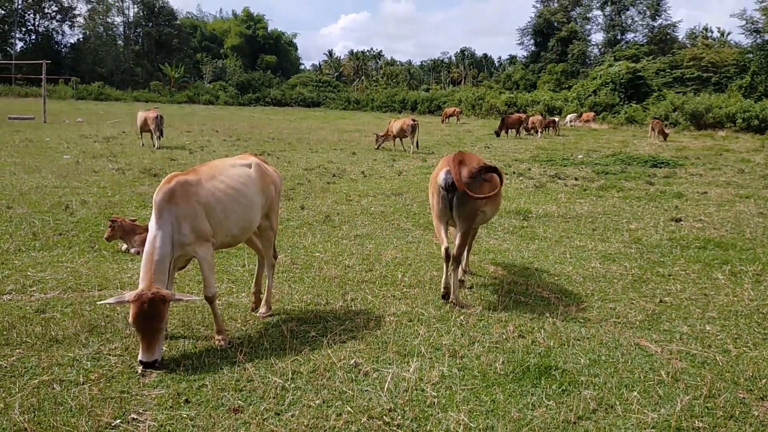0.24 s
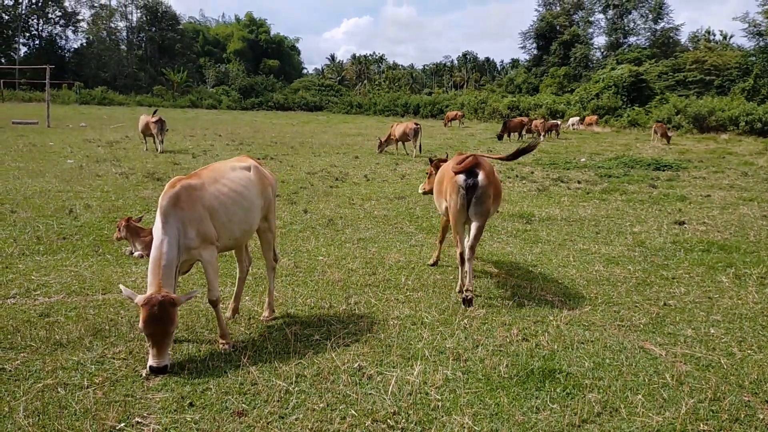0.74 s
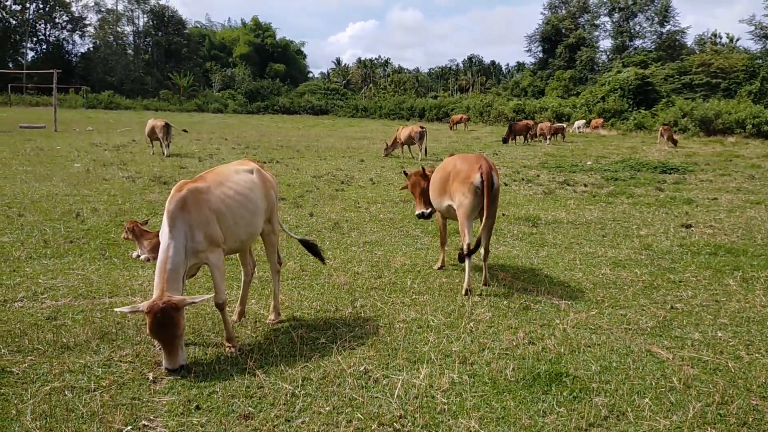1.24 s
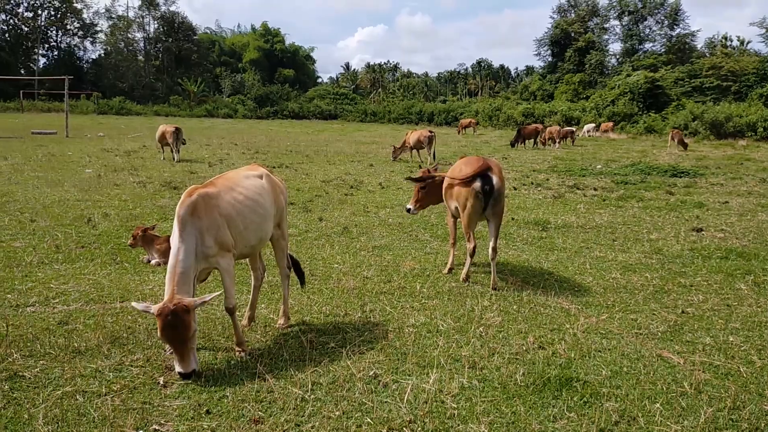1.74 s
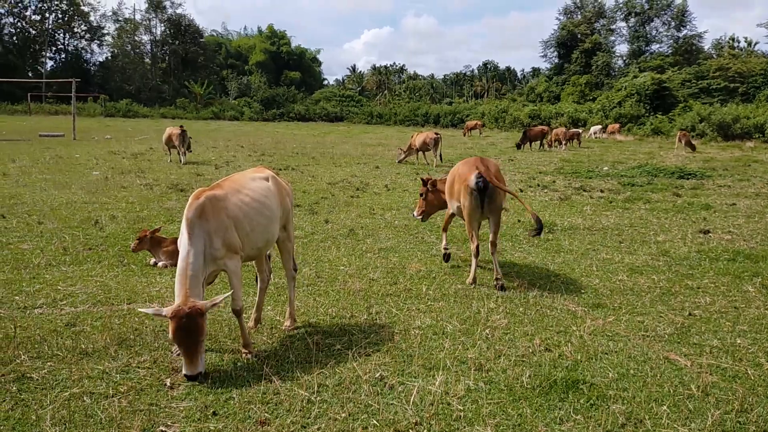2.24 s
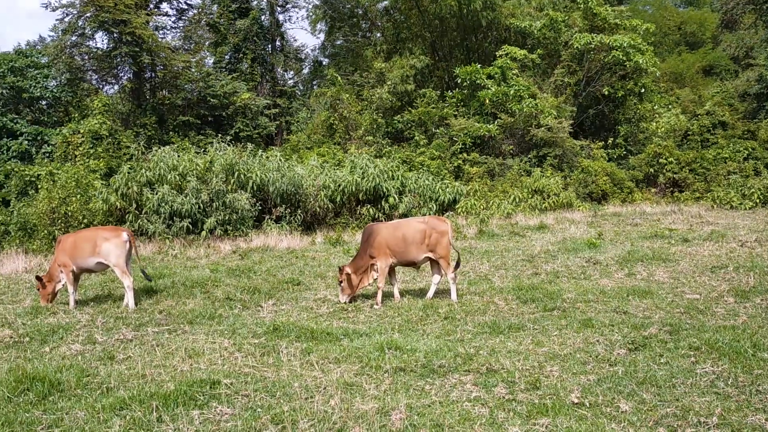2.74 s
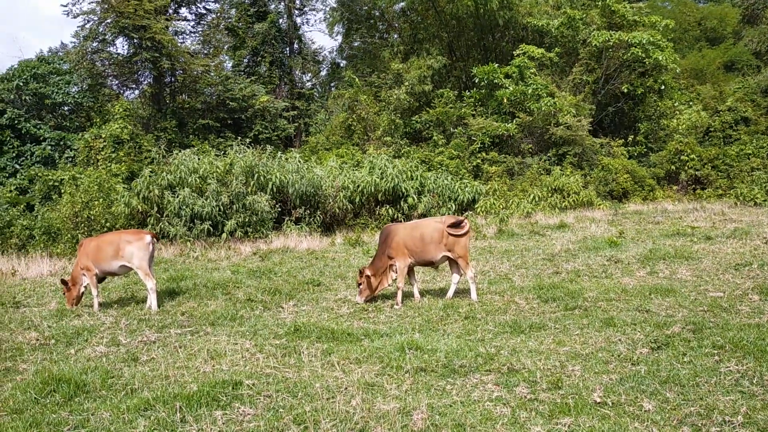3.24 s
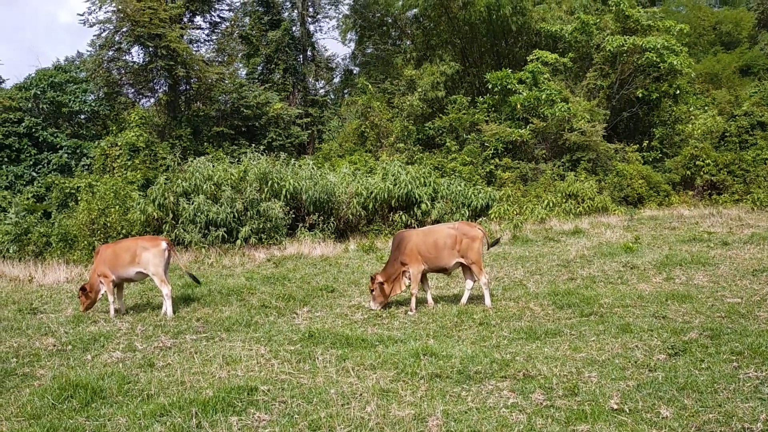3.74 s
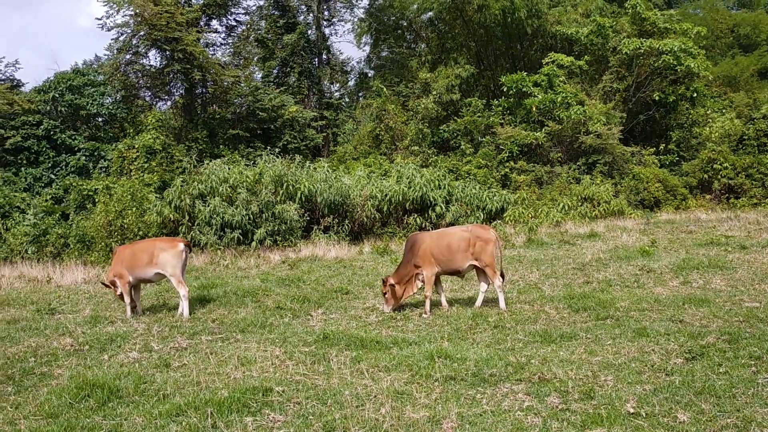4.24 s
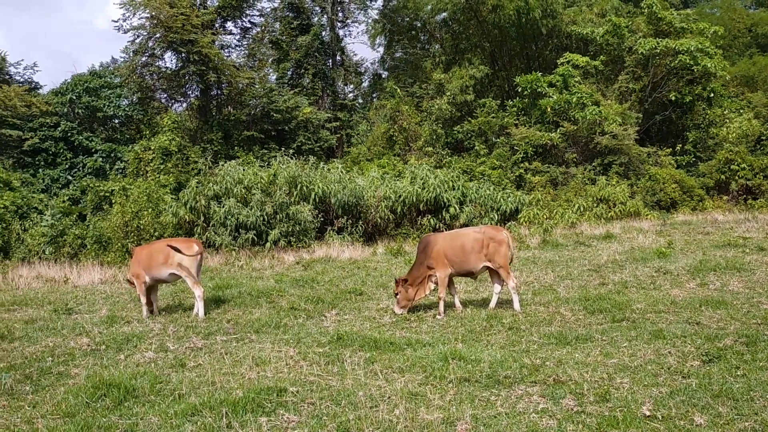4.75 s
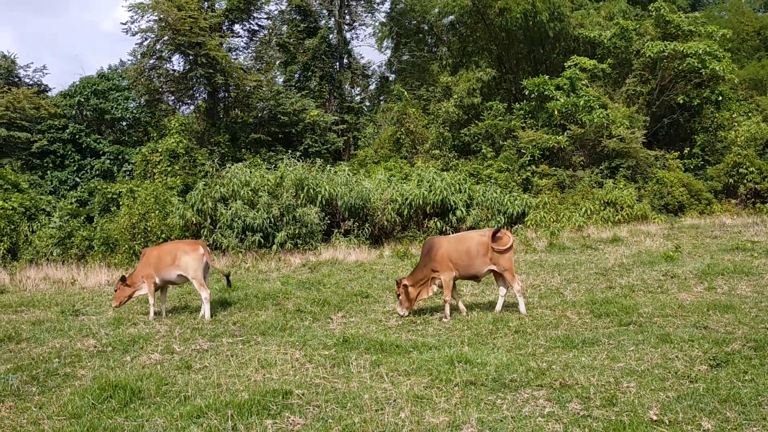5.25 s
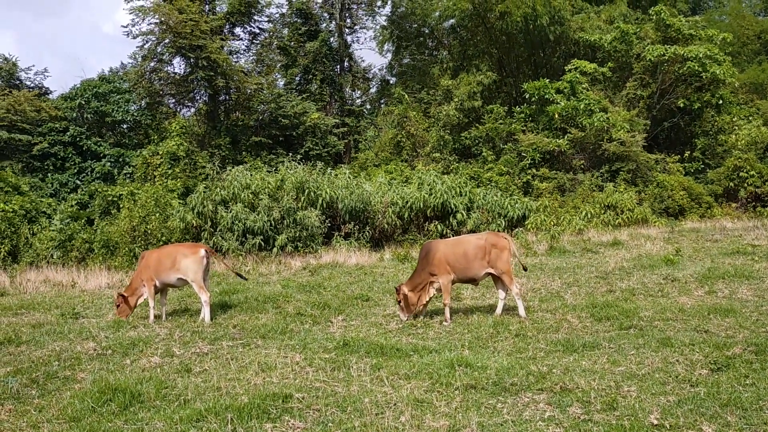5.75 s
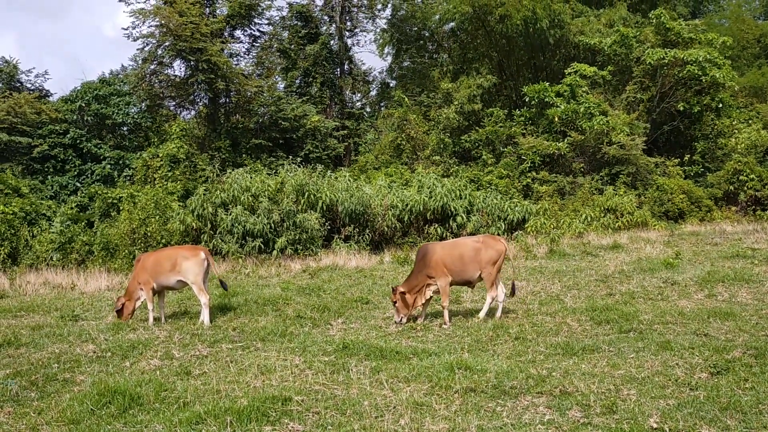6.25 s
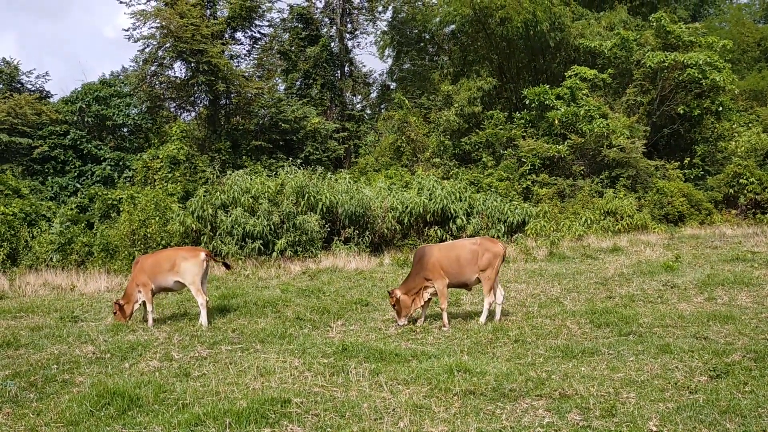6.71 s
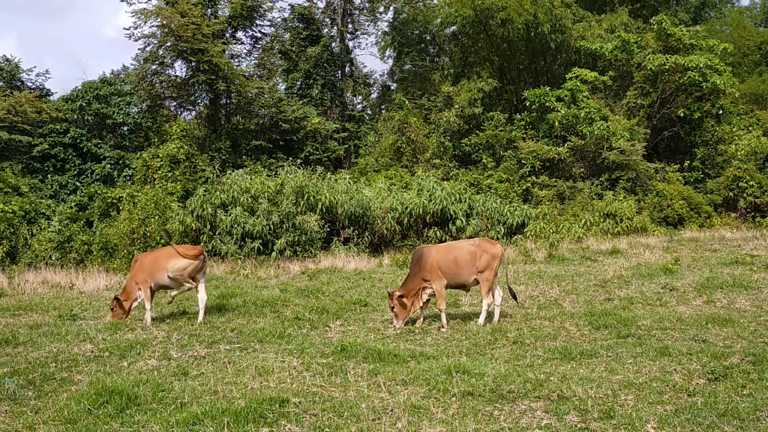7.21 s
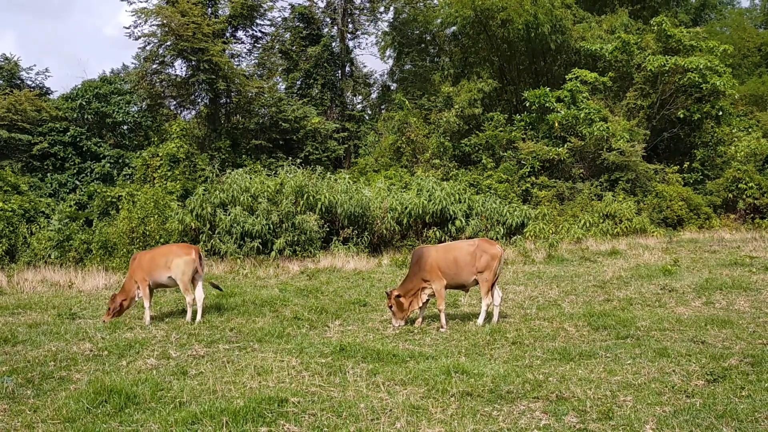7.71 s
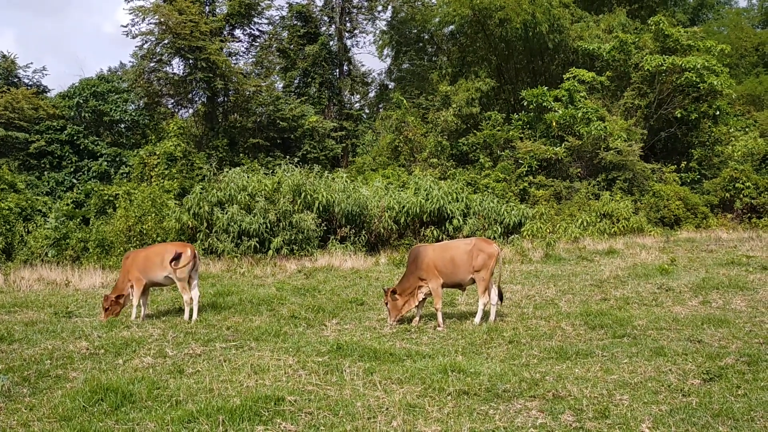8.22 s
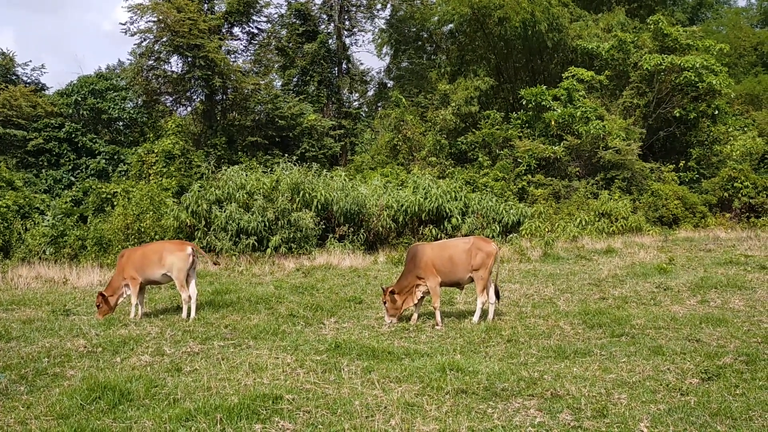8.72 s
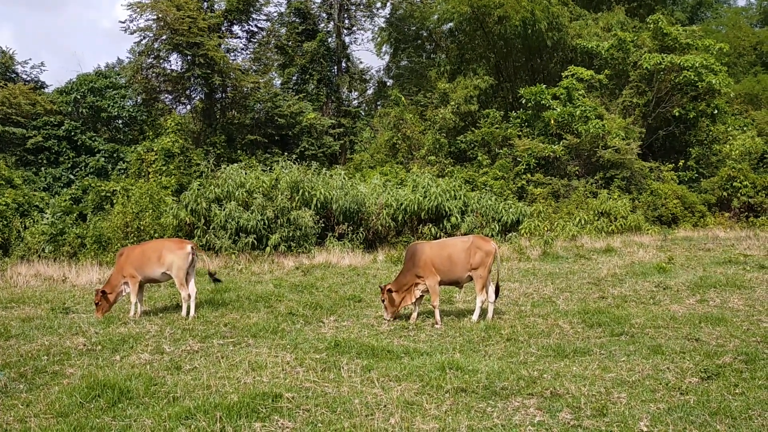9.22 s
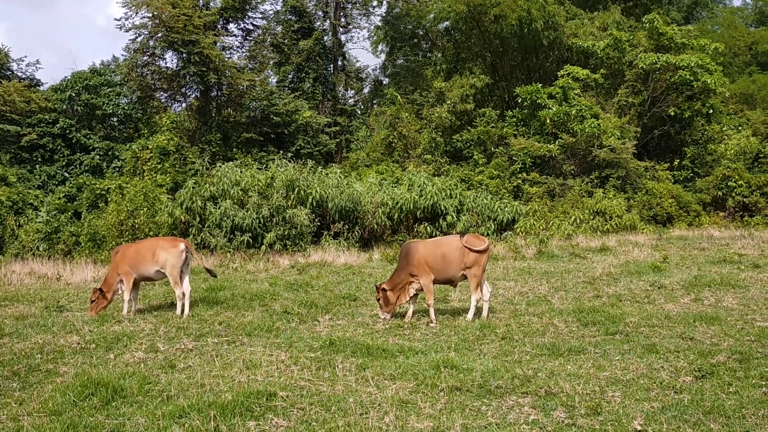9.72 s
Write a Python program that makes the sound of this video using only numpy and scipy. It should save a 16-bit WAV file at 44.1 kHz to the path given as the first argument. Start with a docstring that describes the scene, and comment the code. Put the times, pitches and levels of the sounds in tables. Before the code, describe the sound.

A cow's moo breaks into a rough bellow, then a long two-part moo follows, with light wind and thin bird whistles in a pasture.

```python
"""Cattle in an open pasture. Light wind rumbles on the microphone over a faint hiss, and grass ticks.
A cow moos, then breaks upward into a rough bellow: her vocal folds pulse, her throat rings and
her mouth opens. Small knocks follow, and thin bird whistles begin to pass now and then.
From about six seconds comes a long call in two parts, the first brassy and clear, the second duller.
Every call echoes off the tree line, and the low rumble rises under it."""
import sys
import numpy as np
from scipy import signal
from scipy.fft import rfft, irfft
from scipy.io import wavfile
from scipy.ndimage import uniform_filter1d, map_coordinates

SR = 44100
rng = np.random.default_rng(int(sys.argv[2]) if len(sys.argv) > 2 else 0)


def digitize_waveform(pressure):
    """Quantize a signal to 16-bit integers and store it at the path in sys.argv[1].

    Rows of a 2-D input are taken as channels; values are limited to [-1, 1].
    """
    field = np.atleast_2d(pressure).T
    bounded = np.clip(field, -1, 1)
    quanta = np.round(bounded * 32767).astype(np.int16)
    wavfile.write(sys.argv[1], SR, quanta)


N = 439677
TIME = np.arange(N) / SR
BREEZE_DB = 7 * np.exp(-TIME / 5.3)   # extra stir at the start, dying down


def from_db(db):
    """Turn decibels into a gain."""
    return 10 ** (np.asarray(db) / 20)


def rms_one(x):
    """Scale a sound to an average power of 1."""
    return x / np.sqrt(np.mean(x ** 2) + 1e-20)


def in_time(rows, t):
    """Join a table's rows with straight lines and read each column at the times t."""
    times, *columns = np.transpose(rows)
    return [np.interp(t, times, column) for column in columns]


def butter(x, hz, kind, order=2):
    """Keep the lows, the highs or one band of a sound."""
    return signal.sosfilt(signal.butter(order, hz, kind, fs=SR, output="sos"), x)


def drift(rate_hz, size):
    """A smooth random wobble, about 1 in size, that changes about rate_hz times a second."""
    slow = butter(rng.standard_normal(size + SR), rate_hz, "low")
    return rms_one(slow)[SR:]


def coloured(spectrum, alike):
    """Stereo noise of power 1, shaped by a spectrum; alike=1 makes left and right the same."""
    hz, db = np.transpose(spectrum)
    bins_hz = np.arange(N // 2 + 1) * SR / N
    gain = from_db(np.interp(np.log(bins_hz + 1), np.log(hz), db))
    mid, side = irfft(rfft(rng.standard_normal((2, N))) * gain, N)
    return rms_one(mid + np.sqrt((1 - alike) / (1 + alike)) * side * [[1], [-1]])


# Tone of the rumble: frequency_hz, relative_db
RUMBLE_SPECTRUM = [(22, -29.5), (46, -7), (80, -10), (150, -30.5), (1000, -62.5)]
# Rises of the rumble, three under the calls and two short thumps: start_s, end_s, level_db
RUMBLE_RISES = [(.62, 2.347, -45), (1.78, 1.876, -21), (2.998, 3.29, -47), (6.07, 7.548, -39.5),
                (7.3, 9.6, -42)]


def rumble(calm_db=-62, rise_s=0.15, lumps_db=5):
    """A low, lumpy rumble that rises under each call, with two short thumps."""
    strength = from_db(calm_db + .5 * BREEZE_DB)
    for start, end, db in RUMBLE_RISES:
        ramp = np.minimum(TIME - start, end - TIME) / min(rise_s, (end - start) / 2)
        strength += from_db(db) * np.clip(ramp, 0, 1) ** 2
    return strength * from_db(lumps_db * drift(5.5, N)) * coloured(RUMBLE_SPECTRUM, alike=.5)


# Tone of the open air: frequency_hz, relative_db
AIR_SPECTRUM = [(40, -28), (100, -6.5), (330, -27), (700, -26.5), (2100, -33), (6500, -48)]


def open_air(calm_db=-62.5):
    """A soft wash that sinks as the breeze in the leaves dies down."""
    return from_db(calm_db + BREEZE_DB) * coloured(AIR_SPECTRUM, alike=1)


# Tone of the hiss: frequency_hz, relative_db
HISS_SPECTRUM = [(3000, -36.5), (7000, -10), (8100, 4), (9100, -22.5), (12500, -11), (14800, 1.5)]
# Brief flickers of the top treble: time_s, level_db
TREBLE_FLICKERS = [(3.492, -50.5), (4.88, -47.5), (5.77, -45.5), (6.32, -49), (7.35, -50), (7.858, -44.5)]


def faint_hiss(level_db=-61, flicker_s=0.0053):
    """A faint hiss, with brief flickers in the highest treble."""
    hiss = from_db(level_db + drift(12, N)) * coloured(HISS_SPECTRUM, alike=1)
    swell = from_db(-64 - BREEZE_DB + 5.5 * drift(2.2, N))
    flickers = sum(from_db(db) / (1 + ((TIME - s) / flicker_s) ** 2) for s, db in TREBLE_FLICKERS)
    flutter = from_db(2.2 * drift(80, N))
    treble = butter(rng.standard_normal(N), 12500, "high")
    return hiss + (swell + flickers) * flutter * treble


# Rustling tufts: start_s, length_s, level_db
GRASS_TUFTS = [(0.047, 0.72, -61.5), (2.67, 0.43, -63), (4.11, 0.38, -65)]


def grass(ticks_per_s=11, settle_s=3.7, grains_per_s=500, band_hz=(450, 1700)):
    """Stalks tick at random, ever more rarely; a whole tuft gives a short, dense rustle."""
    ticks = rng.random(N) < ticks_per_s * np.exp(-TIME / settle_s) / SR
    sizes = from_db(-0.5 * np.minimum(rng.exponential(1, N), 4)) * rng.choice([-1, 1], N)
    stalks = butter(ticks * sizes * from_db(-50.5) + 1e-18, band_hz, "band")
    grains = rng.random(N) < grains_per_s / SR
    rustle = rms_one(butter(grains * sizes + 1e-18, band_hz, "band"))
    tufts = sum(from_db(db) * np.sin(np.pi * np.clip((TIME - start) / length, 0, 1) ** .5)
                for start, length, db in GRASS_TUFTS)
    return stalks + tufts * rustle


def vocal_folds(pitch, rough, slap, smear, jitter, shimmer, turbulence):
    """The folds pulse; roughness shakes their timing (jitter) and strength (shimmer) and adds air."""
    size = len(pitch)
    phase = 2 * np.pi * np.cumsum(pitch * (1 + jitter * rough * drift(70, size))) / SR
    # A second slap in mid-cycle weakens the odd harmonics: the voice breaks toward the octave.
    # Smear lets the high harmonics trail the low ones, which softens each pulse.
    pulses = sum(np.cos(k * phase - smear * k * k) * (1 + slap * (-1) ** k) for k in range(1, 100))
    pulses = rms_one(pulses) * (1 + shimmer * rough * drift(64, size))
    puffs = butter(rng.standard_normal(size) * (1 + 0.66 * np.cos(phase)), 220, "high")
    return np.sqrt(1 - rough ** 2) * pulses + turbulence * rough ** 1.5 * puffs


def throat(source, resonances, pitch_ratio):
    """The throat rings at several notes; one with a lean moves that many octaves per octave of pitch."""
    out = 0
    for k, (hz, width_hz, db, *lean) in enumerate(resonances):
        decay = np.exp(-np.pi * width_hz / SR)
        turn = np.exp(2j * np.pi * np.cumsum(hz * pitch_ratio ** sum(lean)) / SR)
        ringing = np.imag(turn * signal.lfilter([1 - decay ** 2], [1, -decay], source / turn))
        out = out + (-1) ** k * from_db(db) * ringing
    return out


def effort(t, push):
    """Level in dB of one push of air: it swells, holds and falls (early if bend is under 1)."""
    start, attack_s, held, end, fall_db, bend = push
    swell = 1 - np.exp(-np.maximum(t - start, 1e-5) / attack_s)
    return 20 * np.log10(swell) - fall_db * np.clip((t - held) / (end - held), 0, 1) ** bend


# The break, a closing grunt, a gaping blare and two last grunts:
# middle_s, half_length_s, chest_db, mouth_db, rasp_db
CALL_ACCENTS = [(1.11, 0.054, 3.5, 5, 4.5), (1.993, 0.03, 7.5, -1, 12), (7.039, 0.22, 3, 4, -0.5),
                (9.134, 0.046, 6, -2.5, -1.5), (9.457, 0.035, 8.5, -9, -13)]


def band_levels(t, push, bands, pitch, opening):
    """Chest (low), mouth (middle) and rasp (high) in dB follow push, pitch, opening and accents."""
    octaves = np.log2(pitch / pitch.max())
    accents_db = sum(np.outer(lifts_db, np.exp(-((t - middle) / half) ** 4))
                     for middle, half, *lifts_db in CALL_ACCENTS)
    return [full_db + effort(t, push) + octave_db * octaves - shut_db * (1 - opening) + accent_db
            for (full_db, octave_db, shut_db), accent_db in zip(bands, accents_db)]


def pasture(x, lag_ms, scatter_db, fade_s=0.21):
    """Sound reaches the left side lag_ms after the right; ground and bushes scatter a short tail."""
    age = np.arange(SR // 2) / SR
    tail = butter(rng.standard_normal((2, len(age))), 600, "high", order=4) * from_db(-60 * age / fade_s)
    tail /= np.sqrt(np.sum(tail ** 2, axis=1, keepdims=True))
    samples, shift = np.arange(len(x)), lag_ms * SR / 2000
    direct = np.array([map_coordinates(x, [samples + side * shift], order=3) for side in (-1, 1)])
    return direct + from_db(scatter_db) * signal.fftconvolve([x], tail, axes=1)[:, :len(x)]


def tree_line(x, echoes, skew_ms=.2):
    """Echoes from either side beat with the gliding voice, so each harmonic swells and dips."""
    out, power = x.copy(), 1
    for k, (delay_s, db) in enumerate(echoes):
        for channel in range(2):
            lag = int(round((delay_s + (-1) ** (k + channel) * skew_ms / 2000) * SR))
            out[channel, lag:] += from_db(db) * x[channel, :N - lag]
        power += from_db(db) ** 2
    return out / np.sqrt(power)


def moo(melody, push, bands, manner, shut, opened, echoes, glide_s, slap, lag_ms, scatter_db, air_db,
        lean_left_db=0, overtone=None, **fold_settings):
    """One call: the folds drive a throat whose ringing changes as the mouth opens."""
    span = (TIME >= push[0]) & (TIME <= push[3])
    t = TIME[span]
    # The folds round off every turn of the tune.
    pitch = uniform_filter1d(in_time(melody, t)[0], size=int(glide_s * SR), mode="nearest")
    rough, opening = np.clip(in_time(manner, t), 0, .99)
    source = vocal_folds(pitch, rough, slap * opening, **fold_settings)
    if overtone:
        source = overtone(source, t)
    ratio = pitch / pitch.max()
    voice = (1 - opening) * throat(source, shut, ratio) + opening * throat(source, opened, ratio)
    voice = pasture(voice, lag_ms, scatter_db)
    chest, mouth, rasp = [signal.sosfiltfilt(signal.butter(4, hz, kind, fs=SR, output="sos"), voice)
                          for hz, kind in ((470, "low"), ([470, 1900], "band"), (1900, "high"))]
    mouth = mouth * from_db([[lean_left_db], [-lean_left_db]])
    levels_db = band_levels(t, push, bands, pitch, opening)
    out = np.zeros((2, N))
    for band, level_db in zip((chest, mouth, rasp), levels_db):
        power = uniform_filter1d(band.mean(axis=0) ** 2, size=SR // 20)
        throb_db = 3 * np.sqrt(rough) * drift(12, len(t))   # a rough voice throbs unevenly
        out[:, span] += band / np.sqrt(np.abs(power) + 1e-14) * from_db(level_db + throb_db)
    # Air hisses through the muzzle, more so when the call is rough.
    rush = butter(butter(rng.standard_normal((2, len(t))), 900, "high"), 3200, "low", order=1)
    out[:, span] += rush * rough * from_db(air_db + 0.26 * levels_db[2])
    out[:, span] *= np.clip(np.minimum((t - t[0]) / 0.01, (t[-1] - t) / 0.11), 0, 1)   # fade in and out
    return tree_line(out, echoes)


# The tune: time_s, pitch_hz
BELLOW_TUNE = [(.62, 123.2), (.72, 131.9), (.83, 145.4), (.94, 163.2), (.97, 135.9), (1.05, 138.1),
               (1.3, 170.7), (1.47, 174.8), (1.69, 190.5), (1.935, 186.4), (1.982, 142.4), (2.03, 121.4)]
# The push of air: start_s, attack_s, held_until_s, end_s, fall_db, bend
BELLOW_BREATH = (.622, 0.19, 1.962, 2.299, 30.5, 0.82)
# Loudness of chest, mouth and rasp: level_db, db_per_octave, shut_mouth_loss_db
BELLOW_BANDS = [(-23, -15, 2.5), (-24, 2.5, 1.5), (-38, 13.5, -6.5)]
# How it is voiced: time_s, roughness_0_to_1, mouth_opening_0_to_1
BELLOW_VOICING = [(.62, .025, 0), (.92, .03, .02), (.97, .55, .8), (1.1, .22, .95), (1.27, .32, 1),
                  (1.95, .29, 1), (2.01, .35, .9), (2.08, .95, .5)]
# Throat ringing, mouth shut: frequency_hz, width_hz, gain_db
BELLOW_HUM = [(146, 17, 8), (274.4, 30, 9), (422, 50, -3.5), (565, 44, -13.5), (1209, 58, 1.5),
              (1784, 70, -12.5), (2205, 116, -9), (2780, 140, -12), (3400, 170, -20.5), (3900, 200, -24.5)]
# Throat ringing, mouth open: frequency_at_top_pitch_hz, width_hz, gain_db, lean
BELLOW_VOWEL = [(196, 130, -10.5, 0.19), (336, 120, 1.5, 0.42), (588, 45, -6, -0.12), (755, 18, -3.5, 0.14),
                (893, 138, 2.5, -0.12), (1219, 138, -4, -0.14), (1610, 84, -3.5, -0.019),
                (2030, 110, -12, -0.0093), (2690, 355, -14.5, -0.092), (3570, 610, -32, -0.23)]
# Echoes off the trees: delay_s, gain_db
BELLOW_TREES = [(.06, -15)]


def bellow():
    """A closed-mouth moo climbs, cracks as the mouth opens, and climbs again as a rough bellow."""
    return moo(BELLOW_TUNE, BELLOW_BREATH, BELLOW_BANDS, BELLOW_VOICING, BELLOW_HUM, BELLOW_VOWEL,
               BELLOW_TREES, glide_s=0.027, slap=0.62, smear=.15, jitter=.05, shimmer=1, turbulence=3.1,
               lag_ms=0.45, scatter_db=-7, air_db=-24, lean_left_db=1.3, overtone=squeal)


# A whistling overtone in the bellow: time_s, pitch_hz, strength_0_to_1
SQUEAL_TUNE = [(.97, 1063, 0.74), (1.07, 995.4, 0.55), (1.2, 918.4, 0.57), (1.35, 877.3, 0.87),
               (1.7, 861.3, 0.76), (1.92, 801, .1)]


def squeal(source, t, waver=0.028):
    """A second vibration sings along and shakes the folds, adding tones above and below its own."""
    hz, strength = in_time(SQUEAL_TUNE, t)
    hz = hz * (1 + waver * drift(41.4, len(t)))
    wave = strength * np.sin(2 * np.pi * np.cumsum(hz) / SR)
    return source * (1 + wave) + 0.26 * wave


# Small knocks close by: start_s, level_db, pitch_hz, crack_db
NEAR_KNOCKS = [(2.399, -35, 880, -52.5), (2.591, -29, 410, -40), (2.713, -38, 306, -47),
               (3.054, -43, 900, -34), (3.09, -34, 700, -50), (3.1162, -21, 625, -22.5),
               (3.465, -30, 700, -35), (3.773, -35, 576, -67), (4.066, -43, 646, -66),
               (4.142, -37, 328, -54)]


def knocks(ring_cycles=3.9, crack_s=0.0078, crumble_s=0.083, echo_s=0.05):
    """Each knock is a crack, a dull ring and a soft crumble, with a faint echo from the trees."""
    out, age = np.zeros(N), np.arange(SR // 20) / SR
    for start, db, hz, crack_db in NEAR_KNOCKS:
        ringing = np.sin(2 * np.pi * hz * age) * from_db(db - 60 * age * hz / ring_cycles)
        crack = rng.standard_normal(len(age)) * from_db(crack_db - 60 * age / crack_s)
        dull_noise = butter(rng.standard_normal(len(age)), hz * 2, "low")
        crumble = dull_noise * from_db(db - 60 * age / crumble_s)
        at = int(start * SR)
        out[at:at + len(age)] += ringing + .5 * (crack + crumble)
    age = np.arange(SR // 2) / SR
    trees = butter(rng.standard_normal((2, len(age))), [600, 2200], "band")
    trees *= from_db(-40 - 60 * age / echo_s)
    return out + signal.fftconvolve([out], trees, axes=1)[:, :N]


# Bird whistles: start_s, length_s, start_pitch_hz, end_pitch_hz, level_db
BIRD_NOTES = [(2.67, 0.13, 5550, 6150, -78), (2.995, 0.04, 3900, 4960, -66),
              (3.063, 0.19, 3700, 6100, -64.5), (4.624, .15, 3490, 5820, -64.5),
              (6.095, .036, 7900, 6430, -57), (7.615, 0.038, 4340, 3100, -47), (7.69, .06, 5550, 5000, -51),
              (7.745, 0.043, 4840, 2960, -41), (8.73, .06, 4350, 5220, -57.5),
              (8.872, 0.029, 4610, 3920, -42.5), (9.17, 0.088, 4700, 4380, -69),
              (9.241, .035, 4384, 5650, -51.5), (9.387, 0.093, 4550, 2430, -55)]


def bird(flick=0.48, waver=0.013):
    """Thin whistles that glide slowly and end in a quick flick."""
    out = np.zeros(N)
    for start, length, start_hz, end_hz, db in BIRD_NOTES:
        along = np.linspace(0, 1, int(length * SR))
        glide = (1 - flick) * along + flick * along ** 6
        hz = (start_hz + (end_hz - start_hz) * glide) * (1 + waver * drift(90, len(along)))
        swell = np.sqrt(np.abs(np.sin(np.pi * along)))
        at = int(start * SR)
        out[at:at + len(along)] += from_db(db) * swell * np.sin(2 * np.pi * np.cumsum(hz) / SR)
    return pasture(out, lag_ms=0, scatter_db=0)


# The tune: time_s, pitch_hz
BRASSY_TUNE = [(6.125, 99.9), (6.3, 106.6), (6.41, 113), (6.68, 121.5), (6.95, 127.1), (7.2, 126.1),
               (7.3, 123.6), (7.48, 112.8), (7.62, 93.5)]
# The push of air: start_s, attack_s, held_until_s, end_s, fall_db, bend
BRASSY_BREATH = (6.132, 0.076, 7.579, 7.72, 18, 0.7)
# Loudness of chest, mouth and rasp: level_db, db_per_octave, shut_mouth_loss_db
BRASSY_BANDS = [(-20, 20.8, 3.6), (-25.5, 18.2, 4.3), (-24, 23.3, 13.2)]
# How it is voiced: time_s, roughness_0_to_1, mouth_opening_0_to_1
BRASSY_VOICING = [(6.12, .3, .04), (6.41, .16, .05), (6.44, .24, .5), (6.58, .14, .96), (6.9, .085, .9),
                  (7.17, .075, .9), (7.36, .26, .85), (7.62, .7, .5)]
# Throat ringing, mouth shut: frequency_hz, width_hz, gain_db
BRASSY_HUM = [(97.2, 82, -3), (657, 52, -1.5), (1025, 24, 1.5), (1580, 300, -21), (2500, 220, -23),
              (2680, 38, -11.5), (3920, 610, -23.5)]
# Throat ringing, mouth open: frequency_at_top_pitch_hz, width_hz, gain_db, lean
BRASSY_VOWEL = [(249, 48.3, -1, 0.14), (381, 21, -15, 0.7), (627, 28, -10.5, 0.91), (924, 89, 5.5, -0.014),
                (1330, 50.5, 8, -0.092), (1648, 88, 4, .3), (2313, 139, 2.5, -0.11), (3254, 110, -7, 0.48),
                (3940, 122, -14, .3), (4690, 75, -16, .4), (5120, 97, -18.5, 0.68),
                (6215, 140, -29.5, 0.061), (10600, 800, -55, 0)]
# Echoes off the trees: delay_s, gain_db
BRASSY_TREES = [(0.0498, -6), (0.0568, -12.5)]


def brassy_moo():
    """The long call begins: sharp, steady pulses rise and fall in one clear arch of pitch."""
    return moo(BRASSY_TUNE, BRASSY_BREATH, BRASSY_BANDS, BRASSY_VOICING, BRASSY_HUM, BRASSY_VOWEL,
               BRASSY_TREES, glide_s=0.07, slap=0.11, smear=.09, jitter=0.035, shimmer=0.18,
               turbulence=3.3, lag_ms=-0.042, scatter_db=-9, air_db=-30)


# The tune: time_s, pitch_hz
DULL_TUNE = [(7.72, 91.5), (8, 105.8), (8.35, 124.6), (8.42, 132.3), (8.68, 142.4), (8.88, 143.4),
             (8.98, 132.5), (9.14, 97), (9.45, 83.1)]
# The push of air: start_s, attack_s, held_until_s, end_s, fall_db, bend
DULL_BREATH = (7.58, 0.0068, 8.6, 9.58, 7.7, 1.27)
# Loudness of chest, mouth and rasp: level_db, db_per_octave, shut_mouth_loss_db
DULL_BANDS = [(-17.5, 18, 5.4), (-26, 2.5, 16.1), (-47, -1, 6.6)]
# How it is voiced: time_s, roughness_0_to_1, mouth_opening_0_to_1
DULL_VOICING = [(7.62, .45, .08), (8.12, .25, .03), (8.15, .08, .9), (8.4, .3, 1), (8.62, .11, 1),
                (8.87, .13, .97), (8.96, .68, .92), (9.3, .45, .14)]
# Throat ringing, mouth shut: frequency_hz, width_hz, gain_db
DULL_HUM = [(84, 58, 10.5), (220, 73, 14), (800, 580, -3.5), (1500, 1000, -12), (2300, 1900, -20.5),
            (5250, 3700, -35)]
# Throat ringing, mouth open: frequency_at_top_pitch_hz, width_hz, gain_db, lean
DULL_VOWEL = [(137, 14, -12, 0.47), (283, 34, 0, 0.51), (370, 27, -5.5, 0.1), (585, 140, -11, 0.41),
              (880, 100, -8, -0.18), (1014, 35, 0, -.3), (1360, 101, -7, .05), (1776, 64, -19.5, 0.12),
              (2200, 225, -18, 0), (3380, 200, -37, 0.3)]
# Echoes off the trees: delay_s, gain_db
DULL_TREES = [(.0518, -7), (.0765, -4.5)]


def dull_moo():
    """The long call ends: a second arch with softer pulses and little rasp, closing in two grunts."""
    return moo(DULL_TUNE, DULL_BREATH, DULL_BANDS, DULL_VOICING, DULL_HUM, DULL_VOWEL,
               DULL_TREES, glide_s=0.041, slap=0.11, smear=.2, jitter=0.047, shimmer=0.46,
               turbulence=2.2, lag_ms=-0.23, scatter_db=-1.5, air_db=-33)


def scene():
    """The cattle, with the small sounds of the pasture around them."""
    cattle = bellow() + brassy_moo() + dull_moo()
    return cattle + knocks() + grass() + bird() + rumble() + open_air() + faint_hiss()


def record(dry):
    """The treble above 15850 Hz is cut steeply."""
    return signal.sosfilt(signal.ellip(12, .1, 90, 15850, fs=SR, output="sos"), dry)


dry = scene()
out = record(dry)
digitize_waveform(out)
```